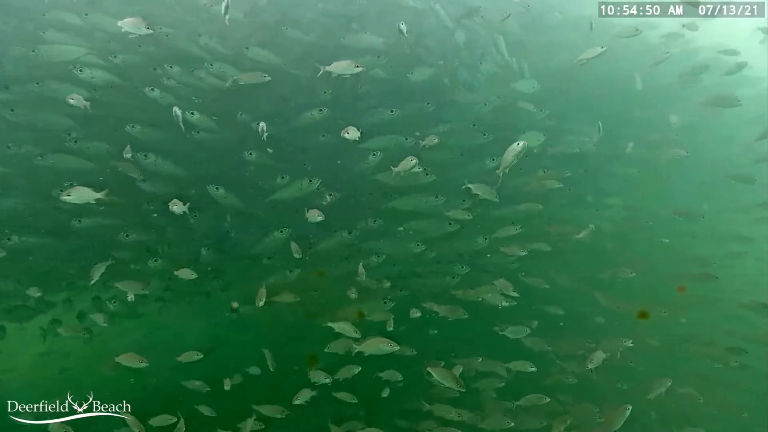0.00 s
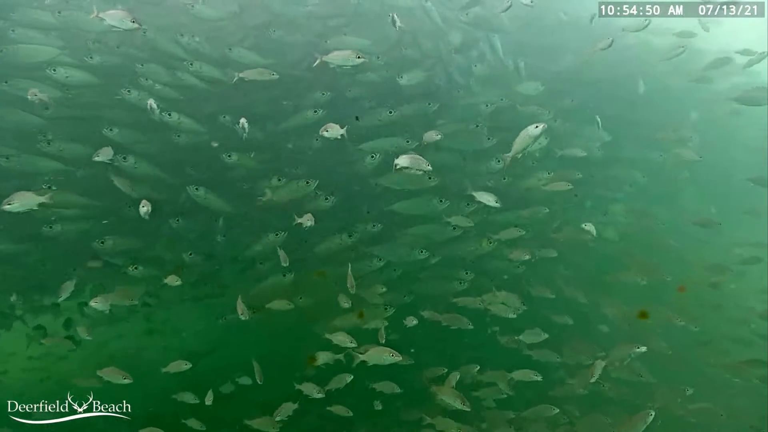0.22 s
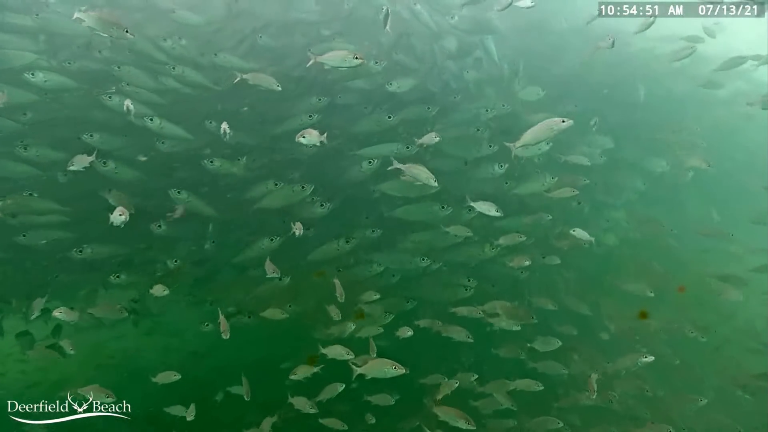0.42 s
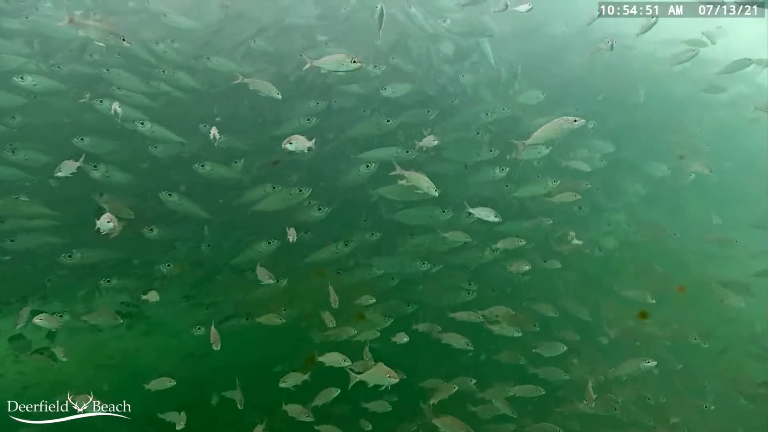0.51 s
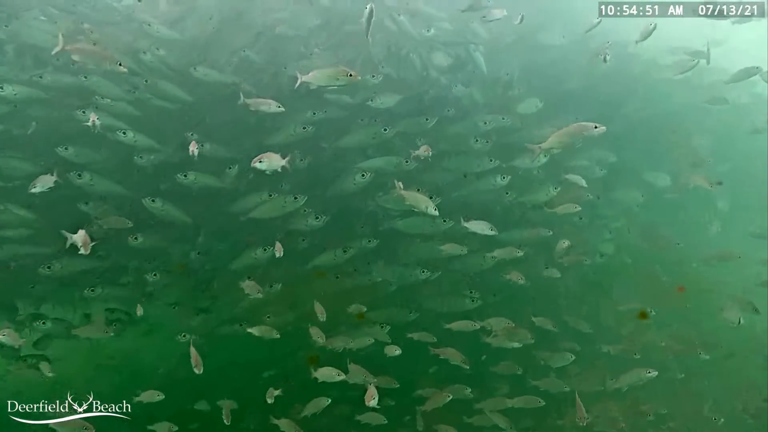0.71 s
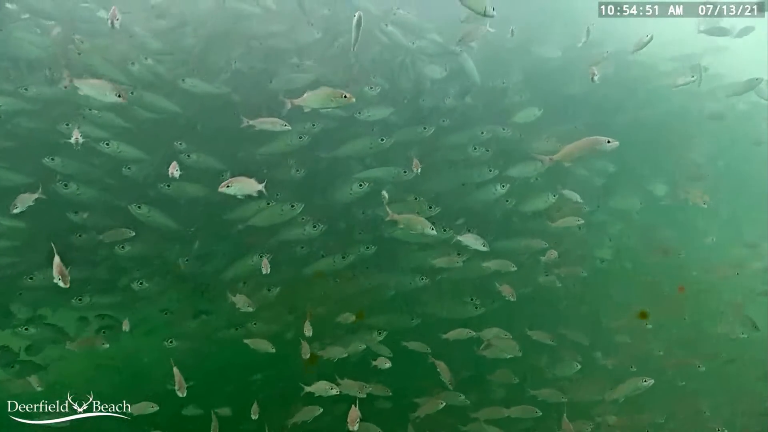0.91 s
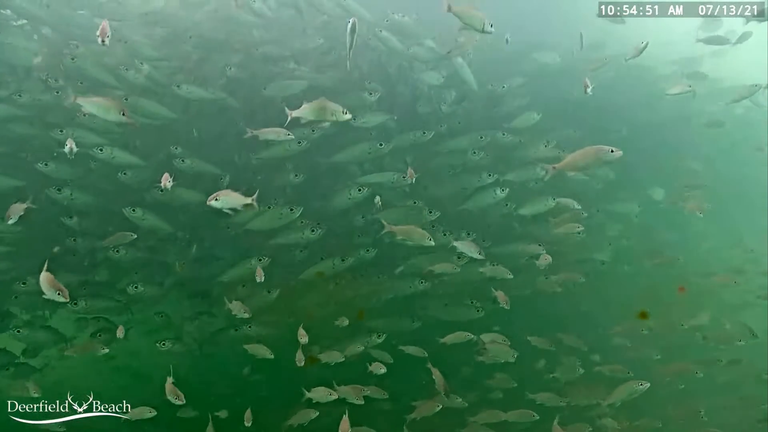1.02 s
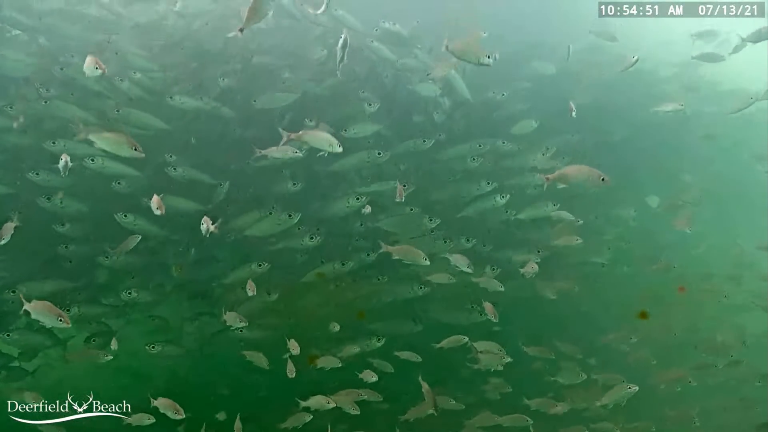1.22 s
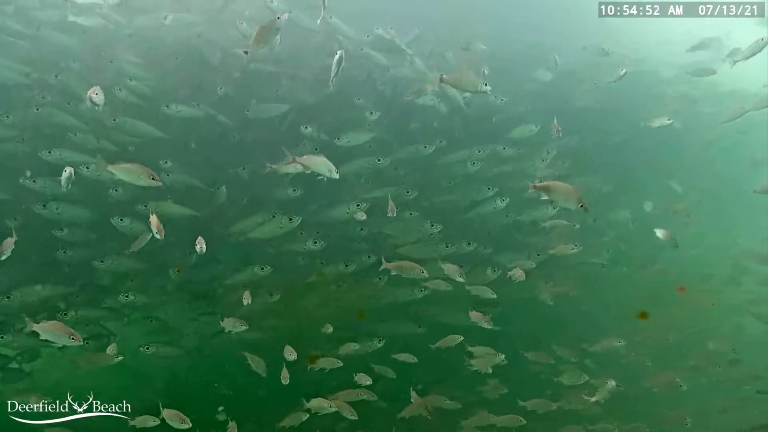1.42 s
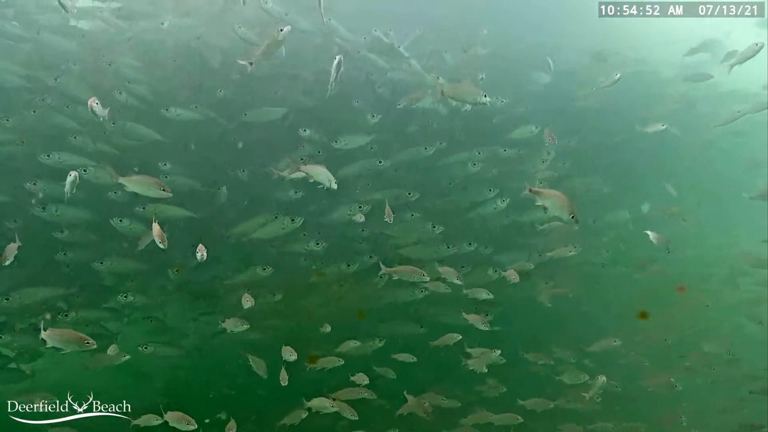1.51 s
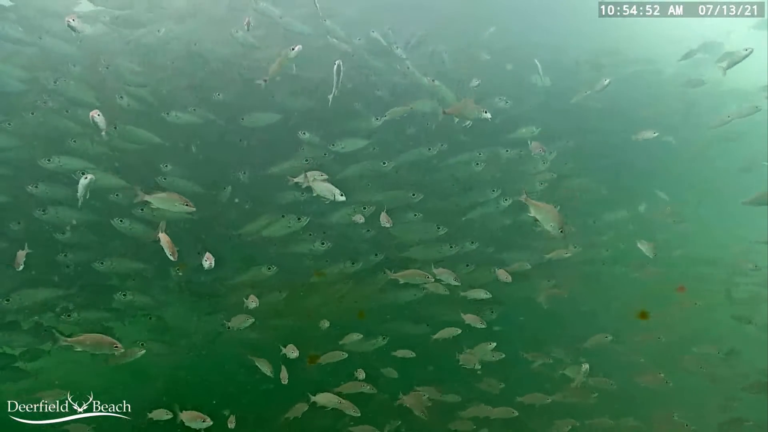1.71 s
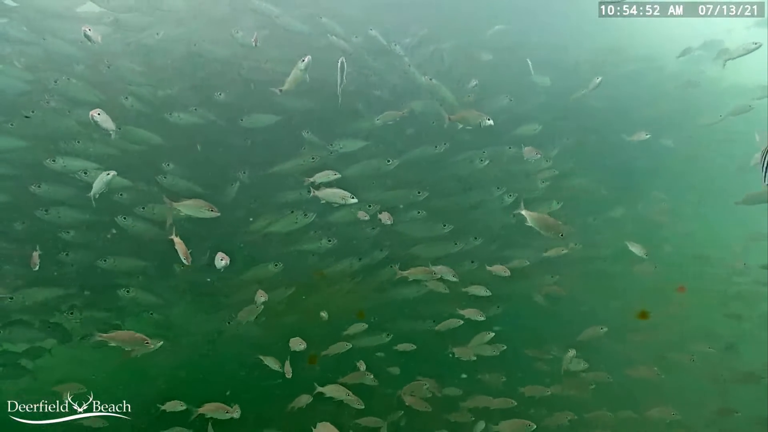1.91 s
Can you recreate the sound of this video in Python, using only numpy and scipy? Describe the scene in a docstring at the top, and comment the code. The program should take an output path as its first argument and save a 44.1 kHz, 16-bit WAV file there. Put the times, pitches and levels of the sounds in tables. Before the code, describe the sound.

A coin drops on a hard tabletop, bounces, then wobbles with a fast rattle.

```python
"""A coin is dropped spinning on a hard tabletop in a quiet room. It bounces, then wobbles on its rim
about seventeen times a second; each turn grinds the rim over the top as a burst of tiny knocks that
ring the table's resonances. Hard landings also set the coin's own modes ringing."""
import sys
import numpy as np
from scipy import signal
from scipy.fft import rfft, irfft, next_fast_len
from scipy.io import wavfile

SR = 44100
rng = np.random.default_rng(int(sys.argv[2]) if len(sys.argv) > 2 else 0)


def digitize_waveform(pressure):
    """Quantize a signal to 16-bit integers and store it at the path in sys.argv[1].

    Rows of a 2-D input are taken as channels; values are limited to [-1, 1].
    """
    field = np.atleast_2d(pressure).T
    bounded = np.clip(field, -1, 1)
    quanta = np.round(bounded * 32767).astype(np.int16)
    wavfile.write(sys.argv[1], SR, quanta)


N = 88200

# each burst in that order: (level dB, swell s, hold s, fall t60 s, treble dB, bass dB)
TURNS = [(-59.5, 0.0012, 0.012, 0.034, -20.5, -23.5), (-13, 0.00033, 0.0037, 0.036, 7.5, -8), (-15.5, 0.001, 0.0045, 0.11, 7.5, -10),
 (-18.5, 0.022, 0.0046, 0.034, 4.5, -3), (-38, .004, 0.0047, 0.15, 14.5, 8), (-21.5, 0.0018, 0.0018, 0.017, 15.5, 5), (-26, .004, 0.0017, 0.16, 11, -5),
 (-23.5, 0.0017, 0.0019, 0.17, 3.5, -4), (-27.5, 0.0075, 0.017, 0.12, 1, -1.5), (-25, 0.0061, 0.013, 0.12, -2, -2.5), (-27.5, 0.013, .008, 0.072, -7, 0),
 (-28.5, 0.0055, 0.014, 0.04, -6.5, 3), (-32.5, 0.0047, 0.0032, 0.043, 3.5, 4.5), (-32.5, 0.0078, .015, 0.033, -8, 0), (-39.5, 0.0043, 0.0058, 0.13, -21, 7),
 (-43, 0.004, 0.0089, 0.061, -33, 2.5), (-51.5, 0.0046, .012, 0.1, -21.5, 15), (-38, 0.0088, 0.0066, 0.078, -17, 3.5), (-29.5, 0.012, 0.0059, 0.11, -17.5, -1.5),
 (-30.5, 0.006, .006, 0.13, -5.5, 0), (-32, .010, 0.0035, 0.071, -15, -2), (-36, 0.0033, 0.0082, 0.11, -11.5, 1), (-31.5, 0.00077, 0.0014, 0.055, 6.5, 5.5),
 (-31.5, 0.0048, 0.0021, 0.14, 1.5, 0.5), (-32, 0.0024, 0.0027, 0.14, 0.5, -5), (-33, 0.0027, 0.0041, 0.072, -6.5, 2.5), (-46.5, 0.0019, 0.0045, 0.13, -24, 8),
 (-58, 0.0018, 0.0014, 0.024, -18, 17), (-38, 0.0011, 0.0022, 0.027, -19, -3), (-61.5, 0.0012, 0.0019, 0.094, 2.5, -7), (-62.5, 0.0031, 0.0015, 0.097, -2, 7),
 (-33.5, 0.0028, 0.011, 0.13, -5.5, -3), (-34, 0.0029, 0.0034, 0.24, -7, 0.5), (-28.5, 0.017, 0.0047, 0.11, -5.5, -5), (-32.5, 0.0047, 0.011, 0.044, -5, 0.5),
 (-33.5, .003, 0.0026, 0.091, -2.5, -0.5), (-37.5, 0.0042, 0.02, 0.06, -5.5, 3), (-27.5, 0.011, 0.0085, 0.092, -10.5, -2.5), (-41, 0.0058, 0.0072, 0.062, -9, 6),
 (-43, 0.0019, 0.0054, 0.068, -18, 9.5), (-34.5, 0.0058, 0.013, 0.074, -17, -1.5)]
# steady rolling between turns: (s, dB)
ROLL = [(.21, -27.5), (.33, -28.5), (.43, -40), (.6, -42), (.8, -48.5), (.9, -76.5), (.96, -65), (1.06, -61),
 (1.22, -51), (1.3, -51), (1.38, -79), (1.5, -92), (1.52, -76), (1.72, -43.5), (1.85, -55), (1.96, -62), (2, -71)]
ROLL_TREBLE_DB = -6
PLACES_S = (.5, 1.1, 1.7)   # fixed  the coin wanders over three spots of the top
# table resonances: (Hz, width Hz, dB at each of the three spots)
TABLE = [(700, 144, -15, -6.5, -10.5), (946.5, 100, 0, 4.5, 4.5), (1209, 66, -1, 2, -4), (1332, 24.7, 0.5, 4, -4), (1504, 210, -3, -2, 2),
 (1675, 48.4, 1, 8, 3.5), (1849, 23.3, -1.5, 11, -13), (1983, 17.4, 1.5, 6, 3), (2293, 41, -1, 5, -7), (2387, 47, -12, -28.5, 3.5),
 (2383, 63, -1, -8, 1.5), (2717, 59, -21.5, 3, 1.5), (2815, 68, -22, -5, -10), (3224, 31.5, -2.5, 3, -34)]
# upper resonances, reached only by sharp contact: (Hz, width Hz, dB)
UPPER = [(3653, 120, -15.5), (3778, 97, -2), (4485, 64, -11), (5176, 360, -15), (5880, 210, -30), (6710, 130, -19.5)]
# low resonances of the table frame: (Hz, width Hz, dB)
LOWER = [(110, 75, -33), (149, 91, -21), (209, 86, -18.5), (293.4, 32.5, -10), (378, 60, -26), (477, 33.6, -9.5), (584, 16.7, -11.5)]
# broad knock under the resonances: (Hz, dB)
KNOCK = [(1300, -16.5), (2200, -7), (3000, -13.5)]
TICK = [(2500, -24.5), (3800, -19), (5000, -30), (6000, -33.5), (8000, -31.5)]
# coin modes, one row per frequency in COIN_HZ: (dB, t60 s), struck on landings: (s, dB)
COIN = [(1, .45), (-4, .35), (-14, .3), (-6, .3), (-10, .3), (-3, .33), (-9, .3)]   # fixed
LANDINGS = [(.207, -50), (.227, -48), (.346, -34)]   # fixed
KNOCKS_PER_S, KNOCK_SPREAD_DB, RUB_SHARE = 7000, 4, .5
FLOOR, FLOOR_DB = [(18, -35.5), (30, -0.5), (173, 11.5), (333, -4), (461, 4), (639, -9.5), (1580, -17.5), (2130, -12.5),
                   (2870, -30.5), (12000, -30.5), (15600, -53.5), (22000, -120)], -61.5   # room hum (Hz, dB per Hz)
CUTOFF_HZ = 16100   # fixed
# each knock in that order: (level dB, treble dB, bass dB)
TAPS = [(-45, -21, -24), (-0.5, -6.5, -6.5), (-7, 6.5, -10.5), (-20, -12, 17), (-17.5, -5, -10.5), (-22, -8, 13), (-7, 7, 0), (-27.5, 7, -16), (-16, 7.5, -4),
 (-31, 11, -27.5), (-20, -1, 10), (-24.5, 1.5, 9.5), (-19, 1, 2), (-31.5, -10, 12), (-43.5, -19, 6), (-22, -6.5, -7), (-23.5, -1.5, -5), (-16, -5, 1),
 (-17.5, 3, -17), (-23, 5, -9), (-25.5, -8, -6), (-25.5, -10, 4), (-33, -20, -17), (-67, -10, -4), (-26.5, -18, 3), (-30.5, -15, 11.5), (-23.5, -18, 4.5),
 (-18.5, -6, -25), (-31.5, -14, 9), (-30, -15, 7), (-37, 2, 9.5)]
CONTACT_CUT_HZ, SPLIT_HZ = 3660, 1450   # soft contact rolls off; resonances under the split follow the bass
AIR_FOLLOWS = 1.55   # the top octave drops faster than the treble as contact softens
AIR = [(7000, -45.5), (9000, -39.5), (11000, -41.5), (13000, -53), (15000, -60)]
THUD = [(500, -19), (800, -14), (1400, -18.5)]
# highest resonances: (Hz, width Hz, dB)
TOPMOST = [(7500, 280, -19.5), (8200, 220, -32), (9210, 180, -32.5), (10790, 190, -35.5), (13000, 440, -52)]
# coin modes (Hz), with (dB, t60 s) each; the spin makes them flicker
COIN_HZ = (4414, 4455, 6710, 7597, 7625, 10175, 10255)   # fixed
FLICKER_DB, FLICKER_PER_S = 5, 35   # fixed
# start of each burst of rim contact (s)
TURN_S = (.141, .2052, .2242, .270, .308, .3442, .352, .3935, .436, .488, .543, .599, .657, .700, .758, .795, .860, .914, .968, 1.025,  # fixed
 1.078, 1.097, 1.144, 1.155, 1.195, 1.256, 1.310, 1.382, 1.392, 1.415, 1.436, 1.5035, 1.563, 1.616, 1.676, 1.692, 1.735, 1.795,  # fixed
 1.862, 1.925, 1.979)  # fixed
# single hard knocks of the rim (s)
TAP_S = (.1418, .2054, .2242, .2290, .2955, .3105, .3443, .3565, .3942, .4525, .5525, .6008, .6585, .8030, .8655, .9800, 1.0317,  # fixed
 1.1441, 1.1557, 1.1945, 1.2168, 1.2625, 1.3920, 1.4362, 1.5045, 1.5210, 1.6380, 1.6925, 1.8652, 1.9265, 1.9885)  # fixed
RETURN_S = (0, .0011, .0020, .0030, .0041, .0075)   # fixed  each knock comes back from the table's edges
RETURNS_DB = (0.5, -2.5, 0, 2.5, -17, -6.5)
TAP_DB, TAP_RING_DB = 14, -10.5   # a knock's broad crack, and how much of it reaches the narrow resonances
DROP_S = .2053   # fixed  the coin lands and starts to roll
# level of the top octave, fading as the spin goes on: (s, dB)
TOP_FADE = [(.2, -8), (.5, -0.5), (.8, -13), (1.1, -4), (1.3, -9), (1.6, -13), (2, -13)]
ROOM_T60_S, ROOM_DB = 0.39, -20.5
WALL_CUT_HZ = 8000   # fixed
WANDER_DB, WANDERS_PER_S = 3.5, 17   # fixed  each resonance is caught differently from turn to turn
LOWER_SHARP_SHARE = 0.58   # the frame answers sharp contact more than soft
TREBLE_CUT_HZ = 9000
THUMP_DB, THUMP_HZ, THUMP_S = -37.5, 176, (.2055, .2245)   # landings push the whole table
# a faint treble shimmer dies away after the landings: (s, dB)
SHIMMER = [(.21, -56), (.35, -56), (.5, -64.5), (.7, -68.5), (.8, -89), (2, -110)]
SHIMMER_TONE = [(5000, 0.5), (9000, -2.5), (15000, -13)]   # (Hz, dB)


def from_db(db):
    """dB to gain."""
    return 10 ** (np.asarray(db) / 20)


def rms_one(x):
    """Scale to rms 1."""
    return x / np.sqrt(np.mean(x ** 2) + 1e-20)


def shaped(x, spectrum):
    """Colour by a smooth spectrum, steep outside its ends; minimum phase, so nothing sounds early."""
    hz, db = np.transpose(spectrum)
    f = np.log(np.arange(N // 2 + 1) * SR / N + 1)
    edge = np.maximum(np.log(hz[0]) - f, 0) + np.maximum(f - np.log(hz[-1]), 0)
    cepstrum = irfft(np.log(from_db(np.interp(f, np.log(hz), db) - 39.8 * edge)), N)
    cepstrum[1:N // 2] *= 2
    cepstrum[N // 2 + 1:] = 0
    return signal.fftconvolve(x, irfft(np.exp(rfft(cepstrum)), N)[:N // 4])[:N]


def resonate(x, hz, width_hz):
    """Two-pole resonance, gain 1 on top."""
    r = np.exp(-np.pi * width_hz / SR)
    return signal.lfilter([(1 - r * r) / 2, 0, (r * r - 1) / 2], [1, -2 * r * np.cos(2 * np.pi * hz / SR), r * r], x)


def grains():
    """Dense uneven knocks of the milled rim plus a little smooth rub; rms 1."""
    sizes = from_db(KNOCK_SPREAD_DB * np.minimum(rng.exponential(1, N), 5)) * rng.choice([-1, 1], N)
    knocks = rms_one(sizes * (rng.random(N) < KNOCKS_PER_S / SR))
    return rms_one(knocks + RUB_SHARE * rng.standard_normal(N))


def pressure():
    """Contact strength in four bands: each turn swells, holds and falls over the steady roll."""
    t = np.arange(N) / SR
    power = ((t > DROP_S) * from_db(np.interp(t, *np.transpose(ROLL))) * band_gains(ROLL_TREBLE_DB, 0)) ** 2
    for s, (db, swell, hold, t60, treble_db, bass_db) in zip(TURN_S, TURNS):
        i = int(s * SR)
        u = t[i:i + SR // 2] - s
        swell, hold = max(swell, 3e-4), max(hold, 0)
        shape = np.clip(u / swell, 0, 1) * from_db(db - 60 * np.maximum(u - swell - hold, 0) / max(t60, 5e-3))
        power[:, i:i + len(u)] += (shape * band_gains(treble_db, bass_db)) ** 2
    return np.sqrt(power)


def table():
    """The knocks ring the top's resonances, whose strengths change as the coin wanders."""
    t, rolling, knocks = np.arange(N) / SR, pressure() * grains(), taps()
    dull = signal.butter(4, TREBLE_CUT_HZ, fs=SR, output="sos")
    rolling, knocks = ([b, signal.sosfilt(dull, tr), a, lo] for b, tr, a, lo in (rolling, knocks))
    rolling, knocks = np.array(rolling), np.array(knocks)
    fade = from_db(np.interp(t, *np.transpose(TOP_FADE)))
    body, treble, air, bass = rolling + knocks
    soft = shaped(body, KNOCK) + shaped(bass, THUD)
    out = shaped(treble, TICK) + shaped(fade * air, AIR)
    body, treble, air, bass = rolling + from_db(TAP_RING_DB) * knocks
    for k, (hz, width, *db) in enumerate(TABLE):
        drive = (bass if hz < SPLIT_HZ else body) * wander(WANDER_DB, WANDERS_PER_S)
        soft += (-1) ** k * resonate(drive * from_db(np.interp(t, PLACES_S, db)), hz, width)
    frame = LOWER_SHARP_SHARE * treble + (1 - LOWER_SHARP_SHARE) * bass
    out += signal.sosfilt(signal.butter(4, CONTACT_CUT_HZ, fs=SR, output="sos"), soft)
    for rows, drive in ((UPPER, treble), (TOPMOST, fade * air), (LOWER, frame)):
        for k, (hz, width, db) in enumerate(rows):
            out += (-1) ** k * from_db(db) * resonate(resonate(drive * wander(WANDER_DB, WANDERS_PER_S), hz, 4 * width), hz, width)
    return from_db(14) * out   # fixed


def coin():
    """Each landing strikes the coin's modes; each mode flickers as the coin turns."""
    out, (s, db) = np.zeros(N), np.transpose(LANDINGS)
    for hz, (level_db, t60) in zip(COIN_HZ, COIN):
        clicks = np.full(N, 1e-18)
        clicks[(s * SR).astype(int)] = from_db(db + level_db) * rng.choice([-1, 1], len(s))
        r, w = from_db(-60 / (t60 * SR)), 2 * np.pi * hz / SR
        out += wander(FLICKER_DB, FLICKER_PER_S) * signal.lfilter([0, np.sin(w)], [1, -2 * r * np.cos(w), r * r], clicks)
    return out


def room(x):
    """Fourteen feedback delays, duller on every round."""
    size = next_fast_len(N + SR)
    z = np.exp(-2j * np.pi * np.arange(size // 2 + 1) / size)
    dull, out = np.exp(-2 * np.pi * WALL_CUT_HZ / SR), 0
    for k, lag in enumerate(np.geomspace(.0093, .041, num=14) * SR):   # fixed
        loop = from_db(-60 * lag / SR / ROOM_T60_S) * (1 - dull) / (1 - dull * z) * z ** int(lag)
        out = out + (-1) ** k * loop / (1 - loop)
    return irfft(rfft(x, size) * out, size)[:N]


def band_gains(treble_db, bass_db):
    """Gains for body, treble, top octave and bass."""
    return from_db([[0], [treble_db], [AIR_FOLLOWS * treble_db], [bass_db]])


def taps():
    """One click per knock and its returns from the edges, in four bands."""
    out = np.zeros((4, N))   # fixed
    for s, (db, treble_db, bass_db) in zip(TAP_S, TAPS):
        for delay, return_db in zip(RETURN_S, RETURNS_DB):
            out[:, int((s + delay) * SR)] += from_db(TAP_DB + db + return_db) * band_gains(treble_db, bass_db)[:, 0]
    return out


def wander(db, per_s):
    """A gain that drifts at random."""
    knots = rng.standard_normal(200)   # fixed
    return from_db(db * np.interp(np.arange(N) / SR * per_s, np.arange(len(knots)), knots))


def thump():
    """A short low push at each landing."""
    clicks = np.full(N, 1e-18)
    clicks[(np.array(THUMP_S) * SR).astype(int)] = from_db(THUMP_DB) * SR / THUMP_HZ
    return resonate(signal.sosfilt(signal.butter(2, [THUMP_HZ * .7, 2 * THUMP_HZ], "band", fs=SR, output="sos"), clicks), THUMP_HZ, THUMP_HZ)


def shimmer():
    """Smooth treble noise under the first bounces."""
    t = np.arange(N) / SR
    return (t > DROP_S) * from_db(np.interp(t, *np.transpose(SHIMMER))) * rms_one(shaped(rng.standard_normal(N), SHIMMER_TONE))


def scene():
    """Coin and table in the room, over its hum."""
    near = table() + coin() + thump() + shimmer()
    hum = from_db(FLOOR_DB) * rms_one(shaped(rng.standard_normal(N), FLOOR))
    return (near + from_db(ROOM_DB) * room(near) + hum)[None]


def record(dry):
    """The loudest peaks just touch full scale; the top is cut."""
    return signal.sosfilt(signal.cheby2(14, 70, CUTOFF_HZ, fs=SR, output="sos"), np.clip(dry, -1, 1))


dry = scene()
out = record(dry)
digitize_waveform(out)
```